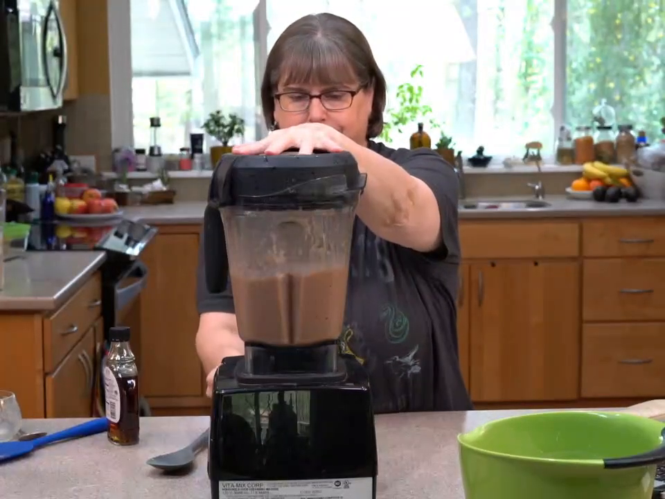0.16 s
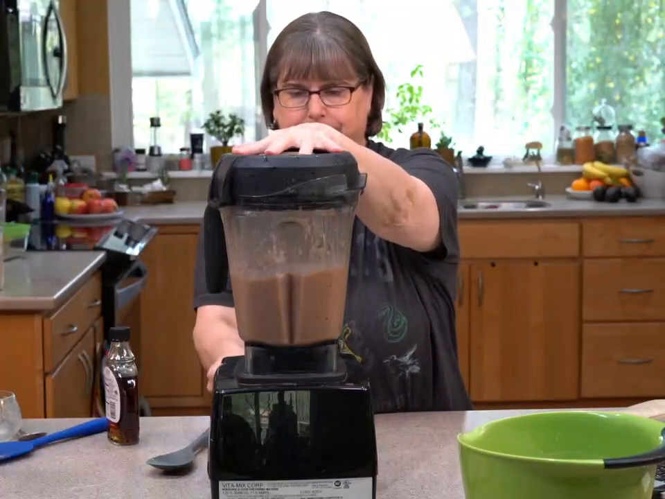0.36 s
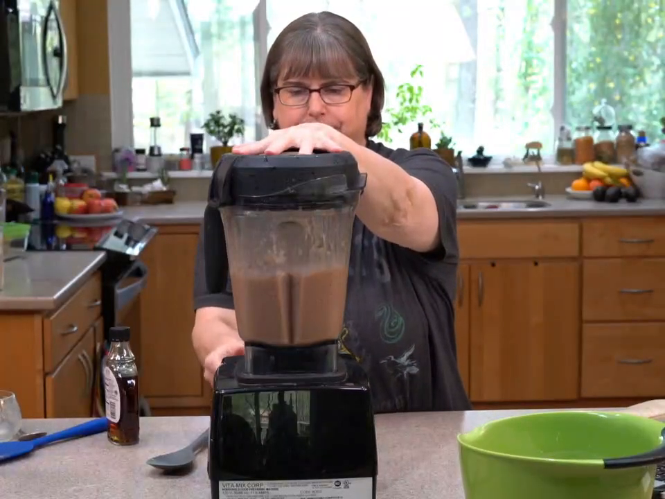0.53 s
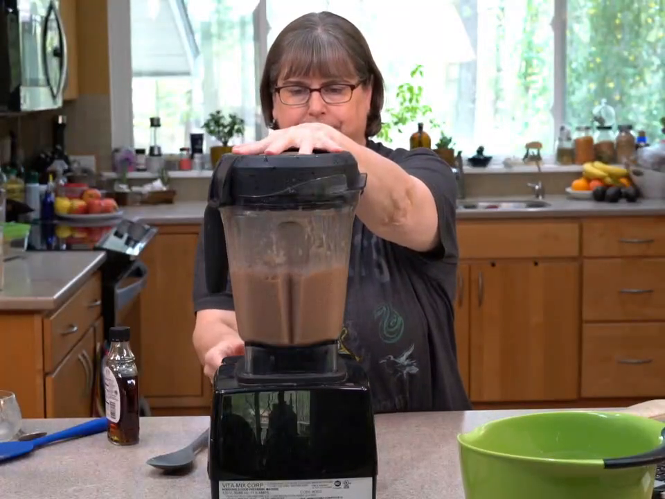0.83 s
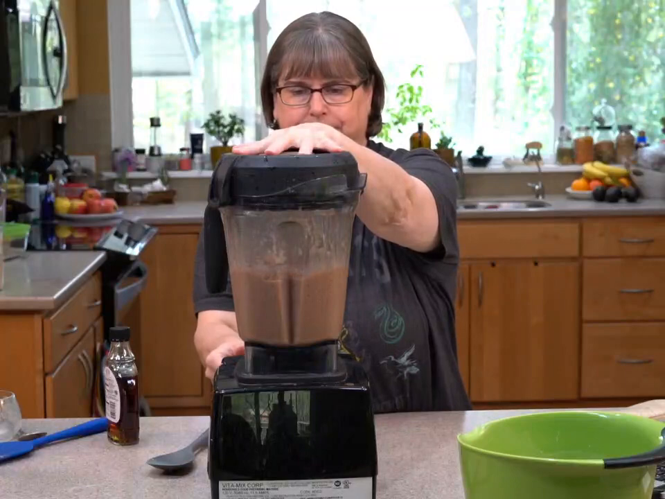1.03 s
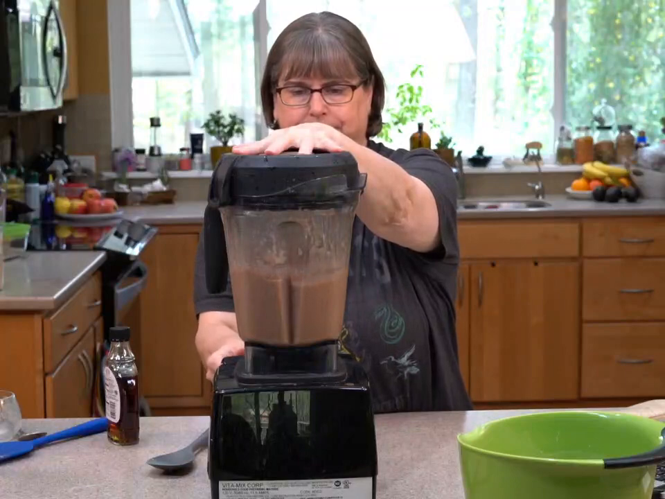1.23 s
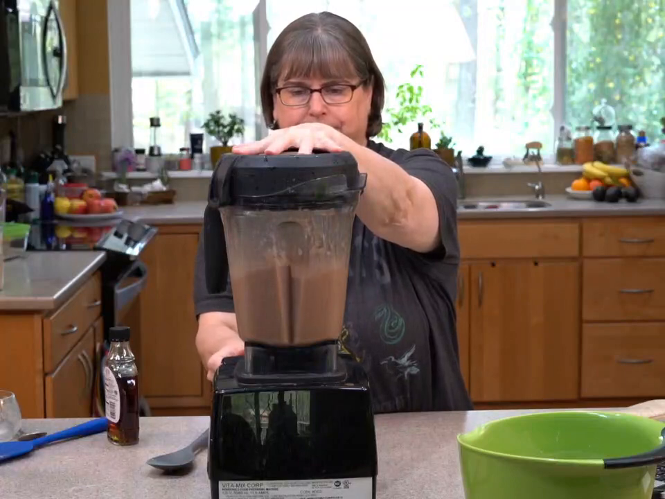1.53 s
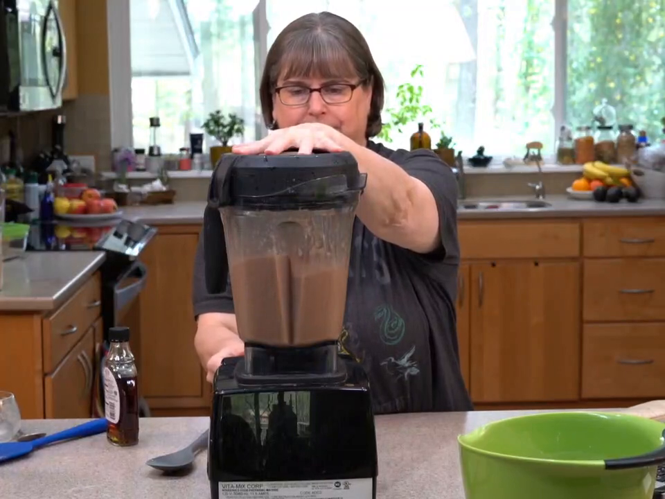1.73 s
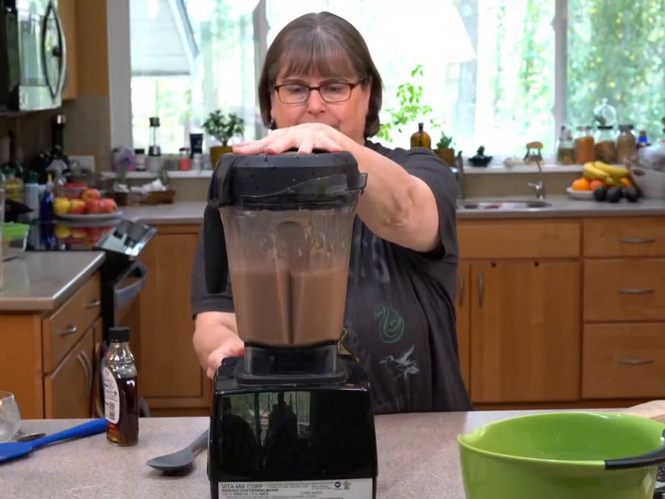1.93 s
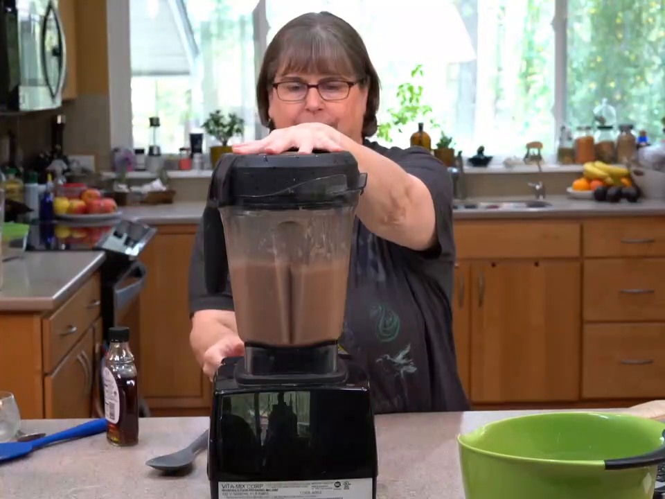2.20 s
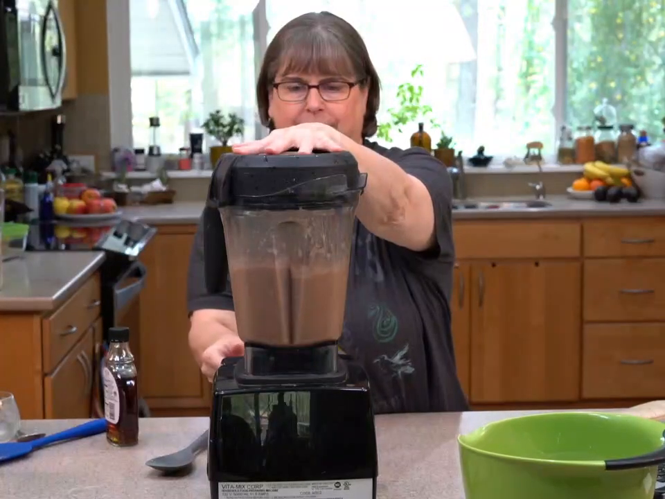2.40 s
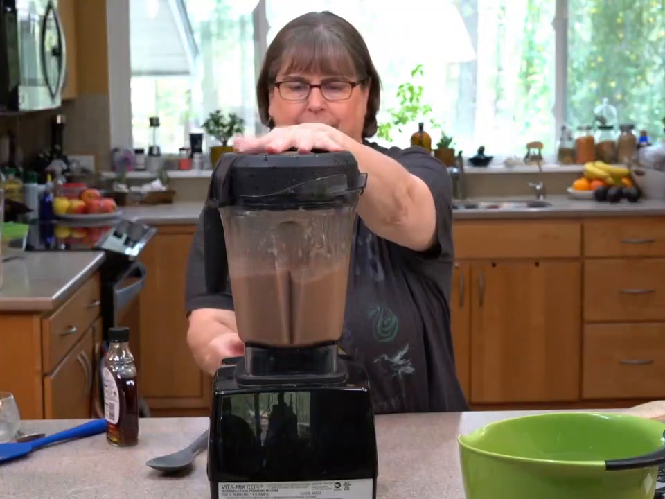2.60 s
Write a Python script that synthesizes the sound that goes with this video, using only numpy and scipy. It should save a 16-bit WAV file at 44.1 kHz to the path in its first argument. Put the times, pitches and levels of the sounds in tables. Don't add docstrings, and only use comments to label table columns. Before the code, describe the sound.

Close microphone on a countertop blender. Quiet clicks and finger bumps lead to a low electric hum; after about a second it surges, ice snapping on the blade and lumps knocking the plastic jar, with short room reflections.

```python
import sys
import numpy as np
from scipy import signal
from scipy.fft import rfft, irfft, next_fast_len
from scipy.io import wavfile
from scipy.ndimage import uniform_filter1d, map_coordinates

SR = 44100
rng = np.random.default_rng(int(sys.argv[2]) if len(sys.argv) > 2 else 0)


def ratio_of_db(decibels):
    return 10 ** (np.asarray(decibels, float) / 20)


def inscribe(sig):
    pcm = np.round(np.clip(np.atleast_2d(sig).T, -1, 1) * 32767)
    wavfile.write(sys.argv[1], SR, pcm.astype(np.int16))


N = 121275
T = np.arange(N) / SR
CHIP_HZ = 5100


def unit(x):
    return x / np.sqrt(np.mean(x ** 2) + 1e-20)


def along(points, hz):
    f, v = np.transpose(points)
    return np.interp(np.log(hz + 1), np.log(f + 1), v)


def wobble(rate):
    return map_coordinates(rng.standard_normal(int(N * rate / SR) + 4), [T * rate])


def filtered(x, response):
    m = next_fast_len(len(x) + SR // 2)
    return irfft(rfft(x, m) * response(np.fft.rfftfreq(m, 1 / SR)), m)[:len(x)]


def rush(spectrum, patchy_db):
    z = signal.stft(rng.standard_normal(N + 512), nperseg=256)[2]
    field = uniform_filter1d(rng.standard_normal(z.shape), 2, 0)
    field = uniform_filter1d(field, 6, 1)
    x = signal.istft(z * ratio_of_db(patchy_db * unit(field)), nperseg=256)[1][:N]
    return unit(filtered(x, lambda hz: ratio_of_db(along(spectrum, hz))))


def snap(count, top_hz, low_hz=1620):
    def response(f):
        low_edge = 1 / np.sqrt(1 + (low_hz / (f + 1)) ** 6)
        return low_edge / np.sqrt(1 + (f / top_hz) ** 4)
    return filtered(rng.standard_normal(count), response)


def ring(hz, t60, t):
    return np.sin(2 * np.pi * hz * t) * ratio_of_db(-60 * t / t60)


def add(out, s, sound):
    part = out[round(s * SR):][:len(sound)]
    part += sound[:len(part)]


def scatter(rate, spread_db):
    draw = rng.random((1500, 3))
    s = np.cumsum(-np.log(draw[:, 0]) / rate)
    size = ratio_of_db(spread_db * np.minimum(-np.log(draw[:, 1]), 3))
    inside = s < T[-1]
    return s[inside], size[inside], draw[inside, 2]


def room_floor():
    # freq_hz, density_db
    floor_spectrum = [(12, -35), (20, -2), (156, -1), (210, -4.5), (330, -4.5), (644, -11.5),
                      (11800, -27.5), (15400, -54), (22000, -120)]
    return ratio_of_db(-59) * rush(floor_spectrum, patchy_db=0.9)


def bird():
    # start_s, length_s, level_db
    calls = [
        (.04, .065, -71),
        (.16, .095, -71),
    ]
    on = 0
    for s, length, db in calls:
        half = length / 2
        on = on + ratio_of_db(db) * np.exp(-((T - s - half) / half) ** 4)
    whistle = np.sin(2 * np.pi * 2810 * T + wobble(123))
    return on * ratio_of_db(2 * wobble(81)) * whistle


def kitchen(x):
    # freq_hz, t60_s
    decay = [(200, 0.47), (2000, 0.56), (10000, 0.19)]
    hz, t, z = signal.stft(rng.standard_normal(SR // 2), SR, nperseg=256)
    fade = ratio_of_db(-60 * t / along(decay, hz)[:, None])
    tail = signal.istft(z * fade, SR, nperseg=256)[1]
    delayed = np.pad(x, (300, 0))
    return signal.fftconvolve(delayed, tail / np.linalg.norm(tail))[:N]


def hands():
    # start_s, peak_db, pitch_hz
    clicks = [(0.256, -46, 9030), (0.2838, -40, 8900), (0.2906, -20, 8370), (0.408, -39.5, 4800),
              (0.463, -21, 7700), (0.5467, -46, 4640), (0.88, -32, 5100)]
    # start_s, peak_db, pitch_hz, t60_s
    bumps = [(.176, -40.5, 89, 0.062), (0.243, -40, 69, 0.071), (.302, -41, 347, 0.049),
             (.118, -53, 990, 0.036), (0.317, -31, 805, 0.0055), (0.317, -37, 1400, .008),
             (.385, -39.5, 312, 0.26), (0.453, -31, 346, 0.13), (.545, -38, 897, 0.13),
             (1.548, -26, 76, .09), (2.05, -28.5, 70, .09)]
    click_t60_s, tail_db, tail_t60_s = 0.016, -12, 0.27
    out, t = np.zeros(N), np.arange(SR // 5) / SR
    fade = 1.76 * ratio_of_db(-60 * t / click_t60_s) + ratio_of_db(tail_db - 60 * t / tail_t60_s)
    for s, db, hz in clicks:
        noise = snap(len(t), top_hz=7750, low_hz=2320)
        add(out, s, ratio_of_db(db - 10.5) * (ring(hz, click_t60_s, t) + noise * fade))
    for s, db, hz, t60 in bumps:
        soft_start = 1 - np.exp(-t * hz * 5.3)
        add(out, s, ratio_of_db(db) * ring(hz, t60, t) * soft_start)
    return out


def hum():
    # time_s, level_db
    hum_level = [(.385, -88), (.4, -58), (.44, -49.5), (.5, -48), (1.1, -49.5), (1.16, -46), (1.24, -75)]
    # multiple, level_db; the rotor pulls the first line up and adds one beside the sixth
    orders = [(1.04, -2), (2, 3.5), (3, -9), (4, -7.5), (5, -2), (5.76, -3.5), (6, 0)]
    mains_hz, wander_db, blur_rad, lead_s = 120, 0.5, 0.14, 0.009
    s, level = np.transpose(hum_level)
    out = np.zeros(N)
    for k, db in orders:
        level_db = np.interp(T + lead_s * k, s, level) + db + wander_db * k * wobble(29.7)
        phase = 2 * np.pi * k * mains_hz * T + blur_rad * k * wobble(40.14)
        out += ratio_of_db(level_db) * np.sin(phase)
    return out


def effort():
    # time_s, churn_level_db, fizz_over_churn_db
    effort_points = [(0.329, -60.5, -3), (.4, -54, -17), (.47, -44.5, -20), (.56, -39, -19),
                     (.7, -43.5, -15), (1.081, -43, -14), (1.15, -34, -18), (1.21, -28, -18),
                     (1.25, -25.5, -14.5), (1.6, -25.5, -13.5), (1.9, -23, -12), (2.15, -25, -12),
                     (2.45, -28.5, -12.5), (2.75, -24.5, -10.5)]
    dial_s, dial_turn_s = 1.173, 0.11
    turns_hz, turn_db = 10, 0.5
    s, level, rel = np.transpose(effort_points)
    fast = np.clip((T - dial_s) / dial_turn_s, 0, 1)
    level_db = np.interp(T, s, level, left=-100)
    level_db = level_db + turn_db * fast * np.sin(2 * np.pi * turns_hz * T + 0.44)
    return ratio_of_db(level_db), ratio_of_db(level_db + np.interp(T, s, rel)), fast


def jar(x):
    # freq_hz, width_hz, level_db
    modes = [(113, 19, -9), (310, 47, 0), (391.6, 8.8, 2), (548.4, 23, 3.5), (1030, 760, -8.5),
             (1437, 33, -2), (1530, 92, -7), (2193, 23, -1.5)]

    def response(f):
        total = 0
        for k, (c, w, db) in enumerate(modes):
            total = total + (-1) ** k * ratio_of_db(db) * 1j * f * w / (c * c - f * f + 1j * f * w)
        return (1j * f / (90 + 1j * f)) ** 2 * total
    return filtered(x, response)


def shake():
    centre_s, lasts_s, level_db, rock_hz = 1.68, 0.3, -14, 111.7
    swell = np.exp(-((T - centre_s) / lasts_s) ** 2)
    rocking = np.sin(2 * np.pi * rock_hz * T + wobble(31.96))
    return swell * ratio_of_db(level_db + 2.4 * wobble(15)) * rocking


def ice_chips():
    t60_s, count = 0.004, 200
    s, size, tone = scatter(220, spread_db=3.5)
    k = np.arange(count)
    grain = rng.standard_normal((1500, count))[:len(s)] * ratio_of_db(-60 * k / SR / t60_s)
    pitch_hz = CHIP_HZ * (0.4 + 0.8 * tone[:, None])
    chips = size[:, None] * (ring(pitch_hz, t60_s, k / SR) + 0.25 * grain)
    places = (s * SR).astype(int)[:, None] + k
    return unit(np.bincount(places.ravel(), chips.ravel(), N + count)[:N])


def churn():
    # freq_hz, density_db
    slow_spectrum = [(30, -21), (160, -18.5), (300, -11.5), (710, -12), (1300, -18), (1800, -18),
                     (3500, -27), (7000, -51)]
    # freq_hz, density_db
    fast_spectrum = [(18, -59), (30, -23), (107, -19), (142, -11), (392, -3), (459, -6), (922, -5),
                     (3500, -17), (4550, -39), (7700, -120)]
    # freq_hz, density_db
    fizz_spectrum = [(1500, -48), (2600, -7.5), (3900, -1.5), (5200, 0.5), (6800, -6), (9000, -13),
                     (11500, -22), (13000, -43)]
    body, fizz, fast = effort()
    s, size, side = scatter(160, spread_db=2.5)
    blows = np.bincount((s * SR).astype(int), size * np.sign(side - 0.5), N)
    lumps = unit(jar(blows))
    stirring = rush(slow_spectrum, patchy_db=1.5)
    churning = rush(fast_spectrum, patchy_db=1.5) + ratio_of_db(-5.5) * lumps
    slosh = np.sqrt(1 - fast) * stirring + np.sqrt(fast) * churning + shake()
    wet = body * slosh + fizz * rush(fizz_spectrum, patchy_db=-4.0)
    chips = fizz * ratio_of_db(-4) * (0.62 + fast) * ice_chips()
    return ratio_of_db(wobble(39.96)) * wet + chips


def thuds():
    # start_s, peak_db, length_s
    grinds = [(1.153, -40, 0.046), (1.22, -11.5, 0.025), (1.257, -13.5, 0.028), (1.383, -14, 0.015),
              (1.465, -24, 0.017), (1.553, -6.5, 0.019), (1.658, -15, 0.029), (1.73, -14, 0.03),
              (1.812, -14, 0.035), (1.888, -9, 0.038), (1.911, -9, 0.027), (1.997, -7.5, 0.047),
              (2.069, -9, 0.044), (2.232, -11, 0.049), (2.303, -12.5, 0.04), (2.601, -10, 0.032),
              (2.653, -15, 0.047)]
    # freq_hz, density_db
    grind_spectrum = [(250, -9.5), (900, -6), (1800, -1), (4000, -10), (9000, -23)]
    # start_s, peak_db, pitch_hz
    booms = [(1.1487, -27, 310), (1.234, -26, 406), (1.2593, -20.5, 334), (1.3407, -19.5, 310),
             (1.3818, -20, 402), (1.4108, -24, 412), (1.4648, -20, 310), (1.506, -21.5, 410),
             (1.5487, -19, 394), (1.6524, -22, 340), (1.7254, -24, 415), (1.7563, -23, 430),
             (1.8926, -15, 390), (2.0733, -20, 459), (2.2195, -23.5, 398), (2.3999, -23, 341),
             (2.4866, -22, 334), (2.518, -27, 382), (2.5608, -19, 413), (2.6039, -18.5, 400)]
    # start_s, peak_db, pitch_hz
    knocks = [(1.1503, -25, 840), (1.2226, -16, 1043), (1.302, -19, 1780), (1.387, -17.0, 990),
              (1.431, -25, 880), (1.9097, -11, 914), (1.9221, -12, 1765), (1.9904, -14, 1080),
              (2.0169, -11.5, 960), (2.0836, -16, 1090), (2.1468, -16.5, 1270), (2.2246, -17, 1096),
              (2.2407, -18.0, 1890), (2.4292, -19.5, 955), (2.5557, -14.5, 1015), (2.659, -21, 1100)]
    boom_rise_s, boom_t60_s = 0.006, 0.065
    knock_rise_s, knock_t60_s = 0.00095, 0.025
    grind, out, t = np.zeros(N), np.zeros(N), np.arange(SR // 6) / SR
    for s, db, length in grinds:
        add(grind, s, ratio_of_db(db - 11.5) * (1 - np.exp(-t / 0.0088)) * np.exp(-(t / length) ** 2))
    for s, db, hz in booms:
        add(out, s, ratio_of_db(db + 8.5) * ring(hz, boom_t60_s, t) * (1 - np.exp(-t / boom_rise_s)))
    for s, db, hz in knocks:
        add(out, s, ratio_of_db(db + 3) * ring(hz, knock_t60_s, t) * (1 - np.exp(-t / knock_rise_s)))
    return out + grind * rush(grind_spectrum, patchy_db=2.5)


def ticks():
    # start_s, peak_db, pitch_hz
    splinters = [(1.1501, -40, 2740), (1.1817, -27, 2840), (1.1873, -28.0, 3680), (1.1906, -26, 3520),
                 (1.242, -19, 3000), (1.2504, -18, 3280), (1.2602, -22, 5220), (1.297, -25, 5090),
                 (1.306, -14, 5400), (1.3144, -16.0, 2900), (1.3199, -11, 3510), (1.323, -15, 3420),
                 (1.4256, -30, 3320), (1.538, -30, 3310), (1.5677, -21, 5130), (1.579, -23, 3180),
                 (1.6687, -18, 2720), (1.7077, -14, 4970), (1.7277, -15.5, 3940), (1.7333, -20, 3680),
                 (1.847, -18, 4250), (1.872, -21, 3040), (1.9387, -13, 2820), (2.0127, -11, 2700),
                 (2.0893, -21, 5240), (2.1089, -21, 3140), (2.1402, -18, 2860), (2.2357, -15, 2800),
                 (2.241, -14.5, 3770), (2.2445, -14, 3370), (2.324, -16.5, 5080), (2.358, -16, 2690),
                 (2.421, -27, 3090), (2.5023, -13.5, 2730), (2.5057, -17.5, 3380), (2.5212, -22, 5500),
                 (2.5572, -18.5, 2860), (2.629, -19, 2880), (2.66, -29, 3640), (2.7308, -16, 2680)]
    t60_s = 0.0052
    out, t = np.zeros(N), np.arange(SR // 50) / SR
    for s, db, hz in splinters:
        puff = ratio_of_db(-2 - 60 * t / t60_s) * snap(len(t), top_hz=5900)
        add(out, s, ratio_of_db(db + 2.5) * (ring(hz, t60_s, t) + puff))
    return out


def cracks():
    # start_s, peak_db, pitch_hz, top_ring_over_peak_db
    breaks = [(1.1547, -19.5, 4700, 1), (1.1722, -11, 5600, -20), (1.2319, 3, 4670, -3.5),
              (1.3035, 7.5, 5230, -14), (1.3668, -6.5, 4700, -14), (1.4093, -6.5, 5700, -2),
              (1.5189, -12.5, 5270, -16), (1.5603, -2, 4450, -19), (1.6234, -8, 5550, -34),
              (1.643, -10.5, 5100, 1), (1.6602, -8.5, 4140, 5), (1.7017, -4, 5350, -23),
              (1.7171, -7.5, 4020, 2.5), (1.7613, -10, 4050, 1), (1.8171, -5, 5600, -24),
              (1.9065, -6, 5030, -28), (1.9733, -12, 5500, -1), (1.9904, -6.5, 5700, 2.5),
              (2.0075, -11, 5100, 3.5), (2.0545, -11, 4900, -29), (2.0851, -4, 5030, -8),
              (2.2264, -1, 5030, -32), (2.2999, -1.5, 4200, -27), (2.3523, 0, 4900, 4),
              (2.4145, -7.5, 4800, -20), (2.4488, -9.5, 4620, -39), (2.4786, -0.5, 5460, -6),
              (2.6138, -11, 5230, -9), (2.6855, -20, 4800, -10), (2.7031, -5, 5260, -1.5)]
    # start_s, peak_db
    splits = [(1.2223, -12), (1.3878, -10), (1.472, -14), (1.5882, -14), (1.597, -14), (1.8353, -15),
              (2.018, -9), (2.2503, -7), (2.2778, -9.5), (2.319, -7), (2.4305, -10), (2.4865, -4.5),
              (2.5304, -8.5)]
    main_t60_s, top_hz, top_t60_s = 0.0055, 8830, 0.0033
    snap_db, snap_t60_s, debris_db, debris_t60_s = -5, 0.012, -19.5, 0.086
    out, t = np.zeros(N), np.arange(SR // 12) / SR
    fade = ratio_of_db(snap_db - 60 * t / snap_t60_s) + ratio_of_db(debris_db - 60 * t / debris_t60_s)
    small = [(s, db, CHIP_HZ, -6) for s, db in splits]
    for s, db, hz, top_db in list(breaks) + small:
        main = ring(hz, main_t60_s, t)
        top = ratio_of_db(top_db - 1.5) * ring(top_hz * rng.normal(1, 0.063), top_t60_s, t)
        low = ratio_of_db(-13) * ring(hz * rng.normal(0.575, 0.12), 2 * main_t60_s, t)
        burst = snap(len(t), top_hz=5900) * fade
        add(out, s, ratio_of_db(db - 6) * (main + top + low + burst))
    return out


def scene():
    ice = cracks() + ticks()
    hits = thuds() + hands()
    room = kitchen(ratio_of_db(-12.5) * hits + ratio_of_db(-12) * ice)
    background = room_floor() + bird()
    return (background + room + hum() + churn() + hits + ice)[None]


def top_cut(x):
    return signal.sosfilt(signal.butter(12, 12000, fs=SR, output="sos"), x)


def record(dry):
    x = filtered(dry[0], lambda hz: 1 / (1 + (hz / 11450) ** 40))
    return top_cut(np.clip(x, -1, 1)[None])


dry = scene()
out = record(dry)
inscribe(out)
```